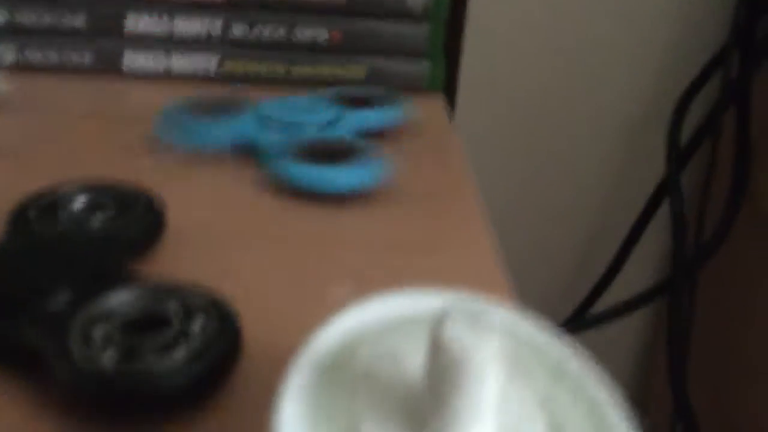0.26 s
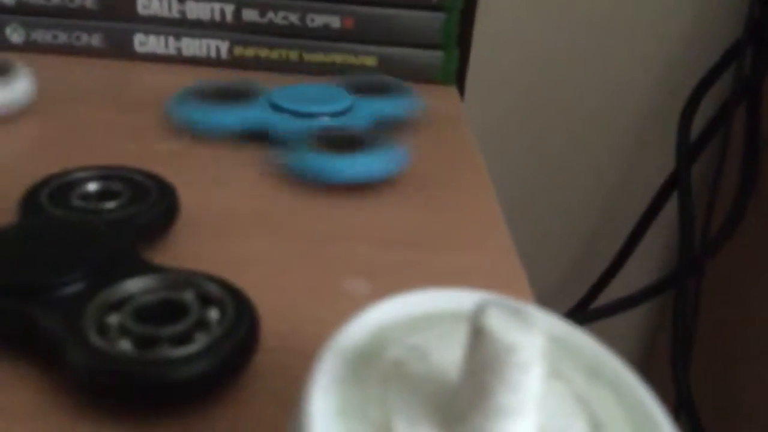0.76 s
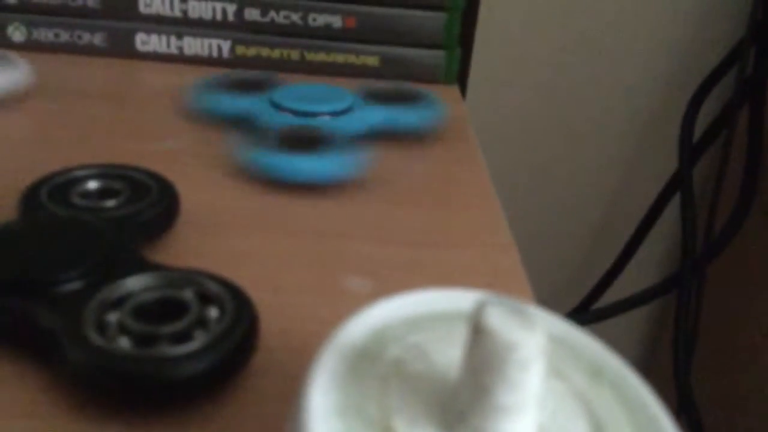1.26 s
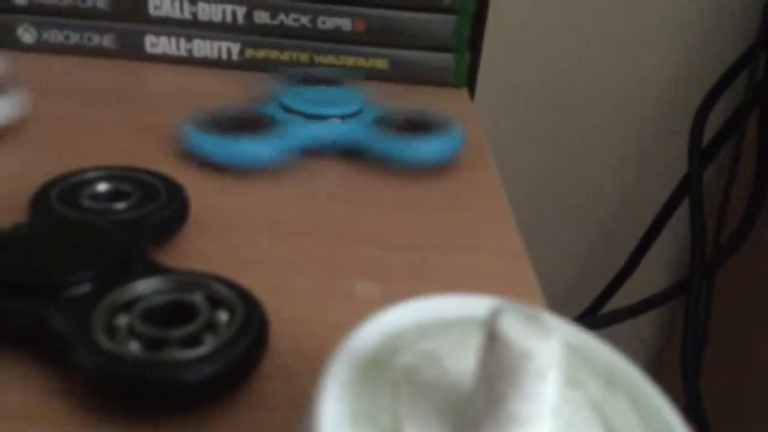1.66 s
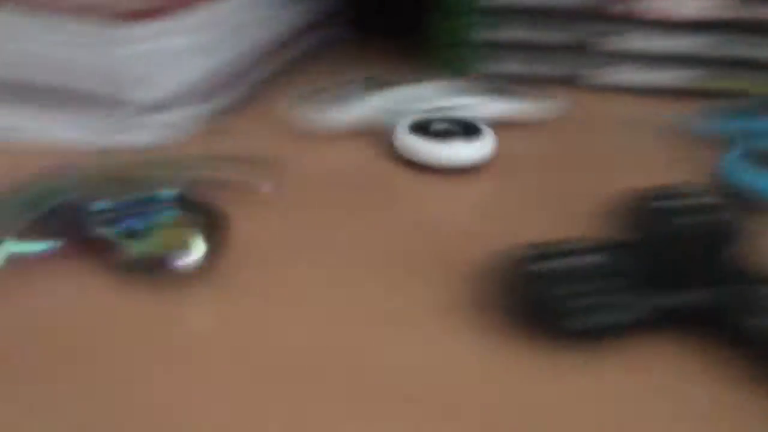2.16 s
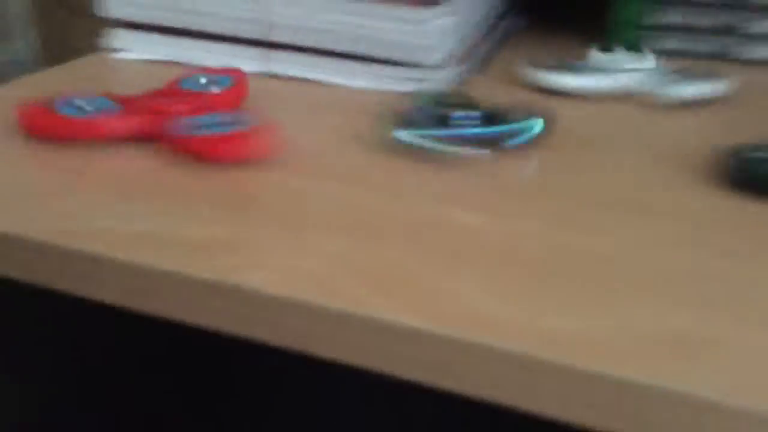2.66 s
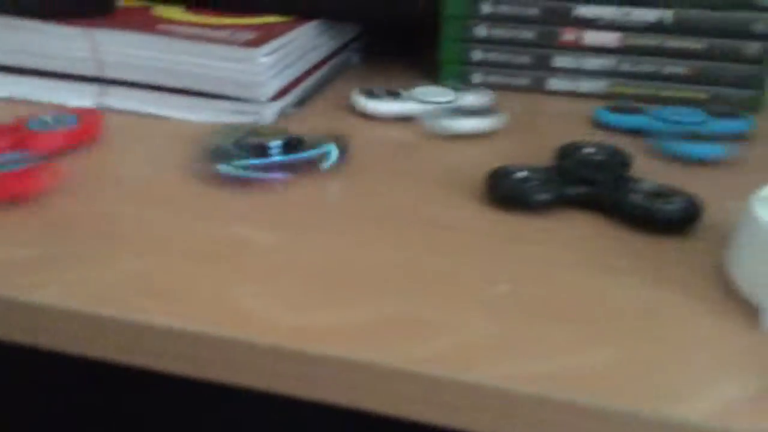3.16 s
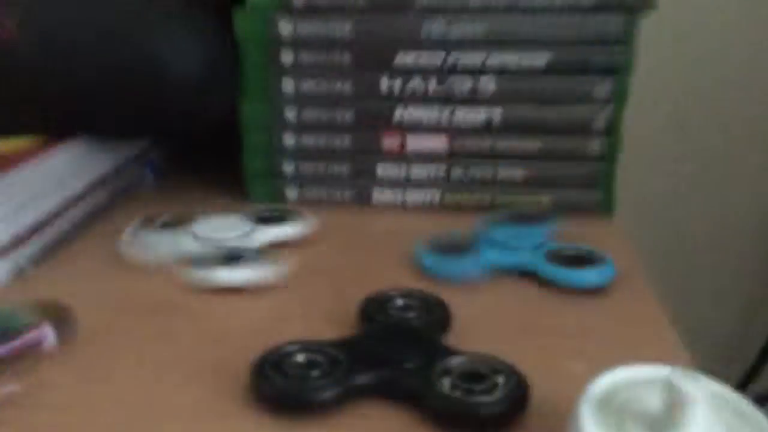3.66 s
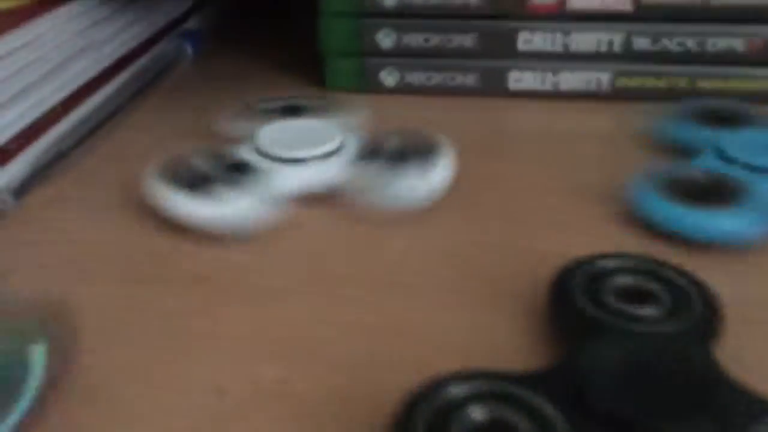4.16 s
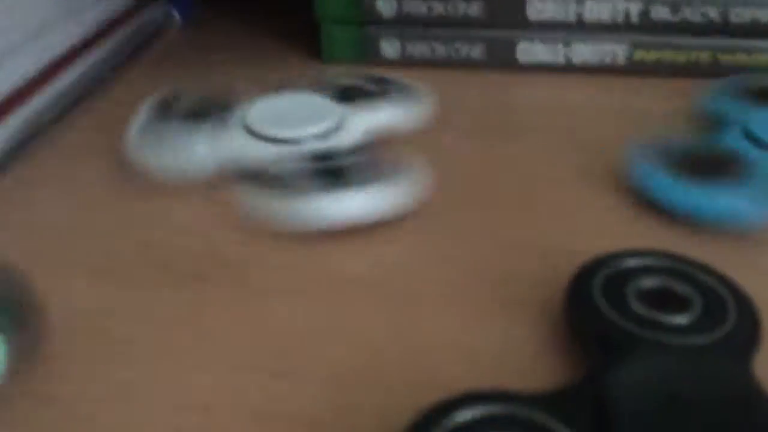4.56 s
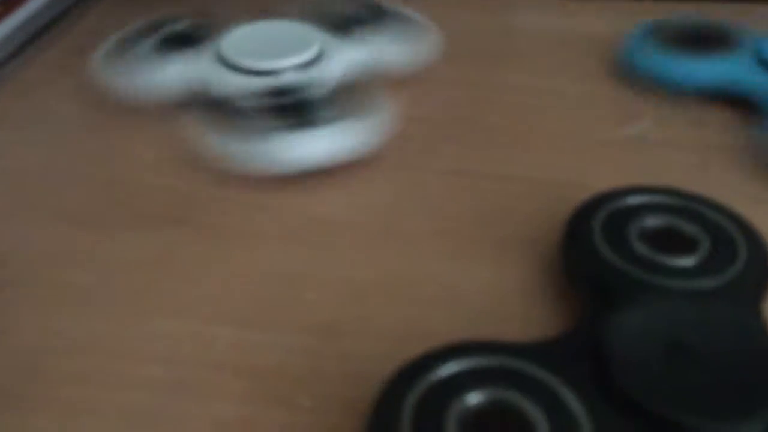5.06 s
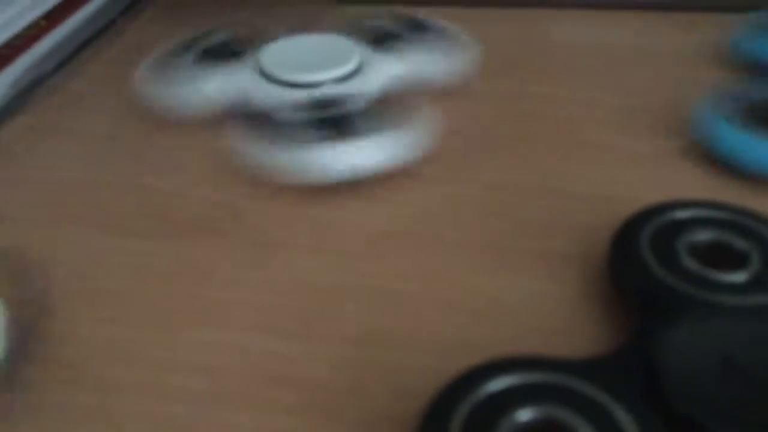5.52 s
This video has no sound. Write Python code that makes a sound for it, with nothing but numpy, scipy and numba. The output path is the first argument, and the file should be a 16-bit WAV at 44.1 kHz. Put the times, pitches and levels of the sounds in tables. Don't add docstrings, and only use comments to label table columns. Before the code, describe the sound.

From 0 to 1.9 s, several finger spinners whir close by on a wooden desk: a dense, grainy rattle of loose balls, ringing plastic at mid-high pitch, with sharp little knocks and lighter clicks. Under it the desk top hums low in uneven throbs and jolts. Soft grip bumps come around 0.5, 0.75 and 1.5 s. At about 1.92 s a stronger thump and a rapid hollow chatter of finger taps mark the phone turning. The ringing slides in pitch and thins, quietest near 3 s, with few knocks and hardly any desk hum. A low thump at 3.4 s and a faint finger rub at 3.5 s lead back in. A deep bump lands at 4.15 s; then the rattle and throbbing hum are close again until 5.8 s, with another thump at 4.7 s. Thin bearing hiss persists throughout, with tiny very high metallic glints near 4.1 and 5.6 s. Dry room, handheld phone microphone.

```python
import sys
import numpy as np
from scipy import signal
from scipy.fft import rfft, irfft
from scipy.io import wavfile
from scipy.ndimage import uniform_filter1d
from numba import njit

SR = 44100
rng = np.random.default_rng(int(sys.argv[2]) if len(sys.argv) > 2 else 0)


def boost_factor(decibels):
    exponent = np.asarray(decibels, float) / 20
    return 10 ** exponent


def transcribe(signal):
    frames = np.atleast_2d(signal).T
    limited = np.clip(frames, -1, 1)
    pcm = np.round(limited * 32767).astype(np.int16)
    wavfile.write(sys.argv[1], SR, pcm)


N = 255311
T = np.arange(N) / SR

# (time [s], place [0 first spinner, 1 turning, 2 stepped back, 3 nearing, 4 last])
PHONE_PLACE = [
    (0, 0.018),
    (1.93, 0.012),
    (2.08, 1.3),
    (2.25, 1.56),
    (2.5, 1.74),
    (3.25, 2.45),
    (3.55, 2.77),
    (4.0, 3.18),
    (4.3, 5),
    (5.79, 5.2),
]
# (time [s], level against a close hold [dB])
NEARNESS = [(0, 0.5), (0.9, 0.5), (1.9, 0.5), (2.15, 0), (2.45, -2.5), (2.95, -5.5), (3.3, -5), (3.6, -3.5),
            (4.15, 1), (4.7, 0), (5.79, 2)]

# (pitch [Hz], width [Hz], level [dB])
BODY_FIRST = [(636, 100, -12), (850, 64, -9), (1072, 71, -9.5), (1240, 45, -19), (1558, 150, 0.5),
              (2232, 290, -3), (2880, 390, 1), (3360, 100, 1.5), (4050, 135, 2.5), (4875, 50, -6),
              (5400, 440, -15), (3050, 120, -12)]
BODY_TURNING = [(610, 83, -1.5), (875, 36, 2), (880, 22, 0), (1350, 36, 1), (1464, 97, 12), (2070, 310, 3),
                (2640, 150, 11.5), (3210, 540, -8), (3560, 36, -7), (5320, 60, -21), (5300, 4900, -3),
                (2900, 100, -23)]
BODY_BACK = [(675, 8.5, -2.5), (796, 34, -29), (1050, 39, -5), (1205, 18, -5.5), (1406, 320, -9),
             (1863, 98, -1), (2584, 130, 2.5), (3236, 71, 3), (4270, 1000, -13), (4760, 57, -22),
             (5340, 300, -12.5), (2960, 110, -9)]
BODY_NEARING = [(646, 63, -13.5), (835, 26, -9), (1140, 30, -40), (1375, 100, -8), (1460, 75, -6),
                (2030, 210, 4.5), (2720, 370, 5), (3500, 170, -2.5), (4140, 350, -17), (4890, 90, 0),
                (5360, 840, -10.5), (2960, 78, -12)]
BODY_LAST = [(616, 130, -1.5), (818, 28, -0.5), (1033, 57, -13), (1347, 128, 2.5), (1570, 180, -2),
             (2070, 280, -12), (2690, 323, 6), (3650, 140, -17), (3995, 220, -2.5), (4880, 31, -3.5),
             (5580, 1600, -4.5), (2960, 33, 3.5)]
ARM_LEVELS = [3.5, 3, -7, -0.5, -0.5]
# (pitch [Hz], width [Hz], share removed [0-1])
DESK_MIRROR = [(3750, 140, 0.6), (3560, 150, 0.7), (3670, 170, 0.95), (3730, 170, 0.85), (3750, 110, 0.6)]
SWAY_HZ, SWAY = 2.3, [0.002, 0.015, 0.014, 0.014, 0.003]
# (pitch [Hz], level [dB])
BODY_TOP_EDGE = [(3550, 0), (3740, -1), (3950, 0), (4250, 0), (4560, -3.5), (4850, 0), (5620, 0),
                 (5780, -8), (5980, -9), (6080, -16), (6500, -18), (7500, -26), (10000, -40)]
# (time [s], peak level [dB], note rung [Hz])
BALL_KNOCKS = [(0.046, -33, 2850), (0.0812, -34, 4080), (0.1121, -45, 3380), (0.171, -41, 2960),
               (0.2453, -36, 3340), (0.3037, -46, 3370), (0.4075, -38, 2860), (0.4474, -54, 3030),
               (0.5013, -32, 3900), (0.531, -34, 2600), (0.6739, -38, 3410), (0.715, -37, 4190),
               (0.828, -38, 2710), (0.8914, -34, 3360), (1.0172, -33.5, 3400), (1.1084, -46, 4080),
               (1.2022, -35, 4180), (1.292, -54, 4130), (1.3389, -36, 2900), (1.4701, -37, 3000),
               (1.5633, -40, 2970), (1.707, -38, 2970), (1.801, -37, 3430), (2.0014, -31, 2800),
               (2.0323, -34.5, 2760), (2.0606, -32, 2810), (2.095, -40, 2820), (2.143, -39, 2720),
               (2.176, -33.5, 3360), (2.648, -39.5, 2590), (2.9557, -43, 3420), (3.1562, -45.5, 2680),
               (3.702, -39, 2630), (3.7723, -40, 2900), (3.812, -34, 2760), (3.8636, -36, 2630),
               (3.9858, -68, 2690), (4.0208, -39, 2930), (4.0925, -38, 2840), (4.1205, -37, 2900),
               (4.275, -35, 2760), (4.3031, -39, 2700), (4.4139, -49, 2780), (4.5628, -42, 2690),
               (4.6555, -36.5, 2680), (4.729, -37, 2700), (4.771, -41, 2770), (4.8178, -45, 2650),
               (4.9548, -38, 2700), (4.9972, -37, 2880), (5.028, -35, 2640), (5.1867, -30, 2620),
               (5.2619, -42, 2960), (5.3243, -39, 2980), (5.3906, -47, 2820), (5.5024, -44, 2650),
               (5.5345, -33, 2710), (5.5752, -34.5, 2820), (5.69, -35, 2864), (5.7317, -36, 2630)]
# (time [s], peak level [dB], note rung [Hz])
CAP_CLICKS = [(0.0298, -52, 5100), (0.0473, -49, 5170), (0.0812, -51, 5100), (0.1845, -55, 5600),
              (0.3726, -55, 5630), (0.5033, -50, 5400), (0.5322, -49, 5090), (0.89, -51, 5350),
              (0.9862, -57, 5420), (0.993, -51, 5520), (1.1054, -53, 5320), (1.2007, -53, 5500),
              (1.29, -57, 5300), (1.3658, -49, 4900), (1.5628, -55, 5210), (1.6586, -54, 4900),
              (1.7065, -56, 4860), (1.7973, -51, 5500), (1.9984, -55, 5160), (2.141, -50, 5200),
              (2.2114, -53, 4900), (2.236, -47, 5300), (2.5717, -49, 5300), (2.6529, -50, 5140),
              (2.6893, -53, 5500), (3.0654, -55, 5350), (3.46, -56, 5520), (3.5329, -54, 4420),
              (3.6491, -51, 5360), (3.7349, -48, 5580), (3.909, -50, 4900), (4.0203, -50, 5170),
              (4.0427, -49, 5100), (4.12, -50, 4440), (4.2038, -51, 5500), (4.2757, -53, 5600),
              (4.3241, -48, 5600), (4.4129, -50, 5320), (4.4847, -53, 5560), (4.5111, -50, 5440),
              (4.5635, -50, 4900), (4.6134, -51, 4890), (4.6548, -51, 5500), (4.7277, -48, 5350),
              (4.8184, -55, 5510), (4.9182, -52, 5510), (4.9741, -54, 5590), (5.026, -53, 5510),
              (5.0704, -48, 5500), (5.1153, -55, 4700), (5.1906, -48, 5400), (5.2769, -53, 5500),
              (5.2934, -47, 5500), (5.4794, -55, 5430), (5.4964, -51, 5340), (5.5353, -43, 5350),
              (5.5752, -59, 5420), (5.6885, -55, 4880), (5.7165, -45, 5660), (5.7354, -46, 5510)]
# (time [s], cap whir gain [dB], desk hum gain [dB])
ROCKING = [(0.01, -3, 6.5), (0.439, 2, -5), (0.6, 2.5, 4), (0.77, 0.5, 0.5), (0.9, 0.5, 3),
           (1.19, 0.5, 7.5), (1.692, 0.5, 6), (1.902, -2.5, 9.5), (2.77, -4.5, 1), (3.14, -4, 8.5),
           (4.26, -2.5, 4.5), (4.4, -3.5, 1.5), (4.532, 1, 3), (4.678, 1.5, 7), (4.9, 0, 5), (5.03, 0, 0.5),
           (5.37, 1.5, 7), (5.5, -1.5, -3), (5.679, -1.5, 0.5), (5.74, -3, 3.5)]

# (pitch [Hz], width [Hz], level [dB])
DESK_MODES = [(345.3, 38.4, 1.5), (300, 32, -2), (240.5, 36, -5), (366, 22.2, -3), (447, 145, -14.5)]
# (time [s], peak level [dB], note rung [Hz])
DESK_JOLTS = [(0.021, -38, 358), (0.148, -40.5, 353), (0.179, -46, 380), (0.311, -35.5, 349),
              (0.435, -41, 366), (0.499, -39, 357), (0.53, -34, 353), (0.708, -37, 343), (0.779, -47, 337),
              (0.882, -41, 331), (1.016, -41.5, 350), (1.122, -39.5, 365), (1.259, -53, 369),
              (1.297, -48, 344), (1.34, -49, 370), (1.363, -36, 351), (1.448, -37, 351), (1.538, -49, 342),
              (1.624, -54, 366), (1.684, -35, 366), (1.784, -59, 358), (1.825, -35.5, 360),
              (1.973, -42, 362), (2.034, -40, 330), (2.137, -43, 363), (2.184, -42, 341), (2.349, -61, 370),
              (2.744, -52, 340), (3.024, -49, 305), (3.263, -44, 350), (3.434, -50, 350), (3.464, -49, 344),
              (3.809, -62, 366), (4.151, -42, 375), (4.228, -35.5, 377), (4.336, -51, 345),
              (4.371, -45, 350), (4.412, -38.5, 307), (4.452, -45, 362), (4.537, -36, 359),
              (4.626, -41, 345), (4.754, -37.5, 359), (4.815, -64, 335), (4.844, -36, 340),
              (4.927, -41, 311), (5.031, -38, 342), (5.084, -41, 338), (5.127, -33.5, 329),
              (5.181, -35.5, 370), (5.226, -37.5, 342), (5.31, -35, 330), (5.431, -49, 366),
              (5.459, -48, 347), (5.497, -36.5, 343), (5.554, -44.5, 320), (5.604, -41, 351),
              (5.652, -37, 358), (5.689, -54, 370), (5.715, -60, 347), (5.748, -51, 353)]
# (time [s], peak level [dB],
# note rung [Hz])
DESK_DRUMS = [(0.255, -53, 296), (0.486, -53.5, 280), (1.073, -56, 276), (1.191, -54, 271),
              (1.261, -52, 289), (1.451, -54, 172), (1.55, -50, 176), (1.654, -54.5, 230), (1.75, -68, 285),
              (1.924, -48, 289), (2.113, -59, 284), (2.321, -56, 239), (2.744, -54.5, 255),
              (3.261, -49.5, 172), (3.354, -72, 242), (3.903, -69, 262), (4.227, -66, 220),
              (4.425, -59, 272), (4.472, -66, 294), (4.06, -46, 348), (4.635, -50.5, 280), (4.68, -49, 200),
              (4.695, -43.5, 281), (4.816, -49.5, 283), (4.995, -50, 300), (5.116, -45, 282),
              (5.184, -47.5, 266), (5.261, -47, 293), (5.352, -45, 367.6), (5.359, -50.5, 227),
              (5.453, -49, 284), (5.566, -48, 258), (5.668, -47, 269)]

# (pitch [Hz], width [Hz], level [dB])
GRIP_MODES = [(110, 43.3, 2), (63, 30.5, 0.5), (36.3, 15, -6), (146, 260, -49)]
# (middle time [s], peak level [dB], length [s])
HAND_SQUEEZES = [(0.03, -51.5, 0.17), (0.27, -50, 0.38), (0.56, -61, 0.055), (0.9, -54, 0.089),
                 (1.21, -73, 0.36), (1.5, -57, 0.6), (1.76, -58, 0.29), (1.93, -53, 0.36),
                 (2.12, -63, 0.19), (2.75, -55.5, 0.21), (2.45, -71, 0.24), (3.08, -68.5, 0.29),
                 (3.75, -67, 0.093), (3.28, -54, 0.088), (3.5, -55.5, 0.52), (3.9, -63.5, 1),
                 (4.2, -57, 0.2), (4.5, -63.5, 1), (4.71, -59, 0.099), (5.0, -64, 0.092), (5.25, -64, 0.29),
                 (5.4, -66, 0.13), (5.58, -64, 0.2), (5.73, -59.5, 0.31)]
# (time [s], peak level [dB], pitch [Hz], length [s])
FINGER_THUMPS = [(0.503, -38, 85.5, 0.047), (0.754, -39, 63, 0.059), (0.883, -60, 102, 0.051),
                 (1.434, -32, 112, 0.04), (1.539, -28, 110, 0.047), (1.686, -61, 110, 0.068),
                 (1.921, -22.5, 167, 0.017), (1.943, -24.5, 92, 0.032), (2.095, -44, 123, 0.056),
                 (2.735, -58, 117, 0.038), (2.91, -38, 62.5, 0.055), (3.25, -37, 171, 0.041),
                 (3.394, -27, 115, 0.062), (3.853, -44, 111, 0.043), (4.155, -20.5, 66, 0.045),
                 (4.162, -30.5, 130, 0.066), (4.35, -65, 110, 0.026), (4.689, -24.5, 99, 0.036),
                 (5.373, -57, 202, 0.02), (5.557, -38, 160, 0.047)]
# (time [s], peak level [dB], note rung [Hz])
CASE_TAPS = [
    (1.9745, -41, 466),
    (1.9785, -34, 1130),
    (1.9788, -36, 1550),
    (1.979, -39, 790),
    (1.981, -29, 794),
    (1.984, -39, 1090),
    (1.987, -38, 760),
    (1.990, -33.5, 472),
    (2.007, -39.5, 800),
    (2.009, -43, 1150),
]
# (time [s], peak level [dB])
CASE_RUBS = [
    (3.5, -61.5),
    (3.57, -64.5),
]
# (pitch [Hz], width [Hz], level [dB])
RUB_NOTE = [(702, 31, 0)]

# (pitch [Hz], level per Hz [dB])
HISS_COLOUR = [(5600, -32), (6200, -6), (6600, -6), (6950, 0.5), (7250, -3), (7700, -9.5), (8600, -7.5),
               (10500, -14), (12500, -17), (14200, -22.5), (15250, -18), (15400, -60)]
# (time [s], peak level [dB])
DRY_SPITS = [(0.0523, -53), (0.1002, -59), (0.2558, -76), (0.5008, -57), (0.5312, -59), (0.5526, -59),
             (1.0595, -63), (1.1493, -68), (1.3957, -65), (1.5564, -69), (1.5833, -61), (1.7315, -75),
             (1.7504, -75), (1.9061, -78), (1.9769, -78), (2.0567, -74), (2.151, -67), (2.3266, -68),
             (2.5721, -64), (3.1023, -73), (3.2765, -74), (3.4116, -79), (3.4511, -77), (3.4875, -71),
             (3.701, -63), (3.7454, -60), (3.7708, -63), (3.8626, -64), (4.0846, -64), (4.12, -61),
             (4.1769, -71), (4.2752, -55), (4.4847, -79), (4.563, -63), (4.6723, -72), (4.7416, -69),
             (4.9756, -63), (5.0265, -58), (5.1188, -72), (5.2465, -60), (5.2969, -56), (5.4645, -76),
             (5.5084, -67), (5.5343, -54), (5.6785, -64)]
# (pitch [Hz], width [Hz], level [dB])
CAGE_MODES = [(6950, 85, 8), (8300, 370, -6.5)]
# (pitch [Hz], width [Hz], level [dB])
METAL_MODES = [(14754, 40, 0), (13457, 40, -6), (9000, 15, -14)]
# (middle time [s], peak level [dB], length [s])
METAL_SWINGS = [
    (0.22, -93, 0.05),
    (2.66, -97, 0.12),
    (3.76, -96, 0.08),
    (4.095, -86, 0.05),
    (4.17, -96, 0.04),
    (5.43, -98, 0.05),
    (5.55, -87, 0.05),
    (5.595, -83, 0.035),
    (5.63, -90, 0.04),
]
# (pitch [Hz], level [dB])
MUTE_BELOW = [(0, -10.5), (5600, -10.5), (6100, -4.5), (6600, -5.5), (11500, -4.5), (13500, -2.5),
              (14500, -2.5), (15000, -6)]

CAPS_DB, CAPS_LOSS = -53.5, 0.87
DESK_DB, DESK_LOSS = -53, 1.61
HISS_DB, HISS_LOSS = -79, 0.8
STILL_HAND_DB, METAL_FAR_DB = -70, -108
ROOM_T60_S, ROOM_DB = 0.15, -20


def unit(x):
    return x / np.sqrt(np.mean(x ** 2))


@njit
def svf(x, hz, width):
    y, band, low = np.empty(len(x)), 0., 0.
    for i in range(len(x)):
        g, k = np.tan(np.pi * hz[i] / SR), width[i] / hz[i]
        v = (band + g * (x[i] - low)) / (1 + g * (g + k))
        band, low, y[i] = 2 * v - band, low + 2 * g * v, k * v
    return y


def walk(rate_hz):
    hold = int(SR / rate_hz)
    steps = np.repeat(rng.standard_normal(N // hold + 1), hold)
    return unit(uniform_filter1d(uniform_filter1d(steps, hold), hold)[:N])


def ring(x, modes, signs, flicker_db=0.):
    one = np.ones(N)
    out = 0
    for sign, (hz, width, db) in zip(signs, modes):
        fed = x * boost_factor(flicker_db * walk(45)) if flicker_db else x
        out = out + sign * boost_factor(db) * svf(fed, hz * one, width * one)
    return out / np.sqrt(sum(boost_factor(db) ** 2 * width * np.pi / SR for hz, width, db in modes))


def add_at(out, s, sound):
    i = int(s * SR)
    out[i:i + len(sound)] += sound[:N - i]


def bursts(events, rise_s, fall_s):
    env = np.zeros(N)
    t = np.arange(int(8 * fall_s * SR)) / SR
    shape = (1 - np.exp(-t / rise_s)) * np.exp(-t / fall_s)
    for s, db, *_ in events:
        add_at(env, s, boost_factor(db) * shape / shape.max())
    return env


def pings(events, decay_s, gain_db):
    out = np.zeros(N)
    t = np.arange(int(8 * decay_s * SR)) / SR
    shape = t / decay_s * np.exp(-t / decay_s)
    for s, db, hz in events:
        add_at(out, s, boost_factor(db + gain_db) * shape * np.sin(2 * np.pi * hz * t))
    return out


def swells(events, rest_db):
    env = boost_factor(rest_db)
    for s, db, length_s in events:
        env = env + boost_factor(db) * np.cos(np.pi * np.clip((T - s) / length_s, -0.5, 0.5)) ** 2
    return 20 * np.log10(env)


def rattle(grain_db):
    strength = np.minimum(rng.exponential(size=N), 5.0)
    return unit(rng.standard_normal(N) * boost_factor(grain_db * strength))


def ball_load():
    return 4.2 * np.tanh(0.2 * walk(45) + 0.55 * walk(130))


def rocking():
    half_width_s = 0.03
    gains = np.zeros((2, N))
    for s, whir_db, hum_db in ROCKING:
        gains += np.array([[whir_db], [hum_db]]) * np.exp(-((T - s) / half_width_s) ** 2)
    return gains


def at_place(place, rows):
    return [np.interp(place, np.arange(5), col) for col in np.transpose(rows)]


def bodies(whir_db, rock_db, load_db):
    place = np.interp(T, *np.transpose(PHONE_PLACE))
    sway = np.interp(place, np.arange(5), SWAY)
    modes = []
    for k, rows in enumerate(zip(BODY_FIRST, BODY_TURNING, BODY_BACK, BODY_NEARING, BODY_LAST)):
        hz, width, db = at_place(place, rows)
        bend = 1 + sway * np.sin(2 * np.pi * SWAY_HZ * (1 + k / 7) * T + k)
        modes.append((hz * bend, width, db))

    balls = rattle(grain_db=3.6)
    knocks = bursts(BALL_KNOCKS, 0.002, 0.005)
    caps_drive = boost_factor(whir_db + rock_db - 3.5 + 0.97 * load_db) + boost_factor(-21.5) * knocks
    caps = ring(caps_drive * balls, modes[5:], np.ones(7), flicker_db=1.5)
    arms_db = np.interp(place, np.arange(5), ARM_LEVELS) + 0.041 * rock_db
    arms_drive = boost_factor(whir_db + arms_db - 5.5 + 0.057 * load_db) + boost_factor(-46) * knocks
    arms = ring(arms_drive * balls, modes[:5], np.ones(5), flicker_db=0.65)

    struck = pings(BALL_KNOCKS, 0.0016, gain_db=-4.0) + pings(CAP_CLICKS, 0.0012, gain_db=4.5)
    both = caps + arms + struck
    hz, width, share = at_place(place, DESK_MIRROR)
    return both - share * svf(both, hz, width)


def air(hiss_db, load_db):
    hz = np.fft.rfftfreq(N, 1 / SR)
    colour_hz, colour_db = np.transpose(HISS_COLOUR)
    colour = boost_factor(np.interp(np.log(hz + 1), np.log(colour_hz), colour_db, left=-60))
    hiss = rfft(rattle(grain_db=3.5)) * colour
    shared = walk(9)
    edges_hz = (0, 7600, 10500, SR)
    bands = 0
    for low, high in zip(edges_hz, edges_hz[1:]):
        band = irfft(hiss * (hz >= low) * (hz < high), N)
        bands = bands + band * boost_factor(0.5 * shared + 1.5 * walk(40))
    spits = boost_factor(-15.5) * bursts(DRY_SPITS, 0.0015, 0.0033)
    return unit(bands) * (boost_factor(hiss_db + 0.71 * load_db) + spits)


def cage(level_db):
    return ring(boost_factor(level_db + 5 * walk(30)) * rattle(grain_db=3.5), CAGE_MODES, np.ones(2))


def metal():
    level_db = swells(METAL_SWINGS, METAL_FAR_DB) + 9
    return ring(boost_factor(level_db) * rattle(grain_db=2.0), METAL_MODES, np.ones(3))


def grip_rumble():
    level_db = swells(HAND_SQUEEZES, STILL_HAND_DB) + 2.5 + 2.5 * walk(13)
    return ring(boost_factor(level_db) * rng.standard_normal(N), GRIP_MODES, (1, -1, 1, -1))


def desk(hum_db, load_db):
    drive = boost_factor(hum_db - 1.5 + 0.73 * load_db) * rattle(grain_db=3.0)
    hum = ring(drive, DESK_MODES, (1, -1, 1, 1, -1))
    lead_s = 0.00407
    early = [(s - lead_s, db, hz) for s, db, hz in DESK_JOLTS]
    return hum + pings(early, 0.0085, gain_db=4.0)


def desk_drums():
    return pings(DESK_DRUMS, 0.011, gain_db=9.0)


def finger_thumps():
    out = np.zeros(N)
    for s, db, hz, length_s in FINGER_THUMPS:
        t = np.arange(int(max(length_s, 0.01) * SR)) / SR
        add_at(out, s, boost_factor(db - 16.5) * np.hanning(len(t)) * np.sin(2 * np.pi * hz * t))
    return out


def case_taps():
    return pings(CASE_TAPS, 0.0018, gain_db=2.0)


def case_rubs():
    return ring(bursts(CASE_RUBS, 0.019, 0.017) * rng.standard_normal(N), RUB_NOTE, np.ones(1))


def room(x):
    t = np.arange(int(0.2 * SR)) / SR
    tail = rng.standard_normal(len(t)) * np.exp(-np.log(1000) * t / ROOM_T60_S)
    wet = signal.fftconvolve(x, tail / np.sqrt(np.sum(tail ** 2)))[:N]
    return x + boost_factor(ROOM_DB) * wet


def scene():
    near_db = np.interp(T, *np.transpose(NEARNESS))
    whir_db, hum_db = rocking()
    load_db = ball_load()
    near = bodies(CAPS_DB + CAPS_LOSS * near_db, whir_db, load_db)
    near = near + desk(DESK_DB + DESK_LOSS * near_db + hum_db, load_db) + desk_drums()
    edge = boost_factor(np.interp(np.fft.rfftfreq(N, 1 / SR), *np.transpose(BODY_TOP_EDGE)))
    near = irfft(rfft(near) * edge, N)

    hiss_db = HISS_DB + HISS_LOSS * near_db
    treble = air(hiss_db, load_db) + cage(hiss_db - 9.5) + metal()
    hand = grip_rumble() + finger_thumps() + case_taps() + case_rubs()
    return (room(near) + treble + hand)[None]


def mute_weak_bands(x, cut_db):
    hz, _, z = signal.stft(x, SR, nperseg=2048)
    own = uniform_filter1d(uniform_filter1d(np.abs(z) ** 2, size=6, axis=-2), size=2, axis=-1)
    around = np.exp(uniform_filter1d(np.log(own + 1e-18), size=60, axis=-2))
    weak = own < around * boost_factor(2 * np.interp(hz, *np.transpose(MUTE_BELOW)))[:, None]
    weak[:, :70] = False
    return signal.istft(z * np.where(weak, boost_factor(cut_db), 1), nperseg=2048)[1][:, :N]


def roll_off(x):
    return signal.sosfilt(signal.butter(12, 15590, fs=SR, output="sos"), x)


def record(dry):
    hz = np.fft.rfftfreq(N, 1 / SR)
    lows = 1 / np.sqrt(1 + (40 / (hz + 1)) ** 4)
    kept = mute_weak_bands(irfft(rfft(dry) * lows, N), cut_db=-20)
    mix = irfft(rfft(kept) * (hz < 15280), N)
    return roll_off(mix)


dry = scene()
out = record(dry)
transcribe(out)
```